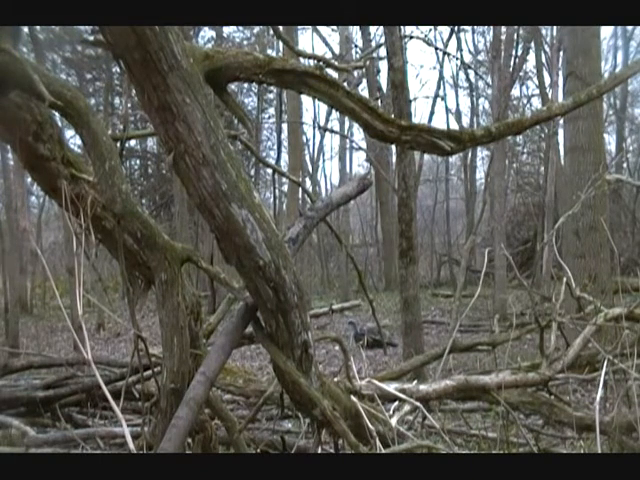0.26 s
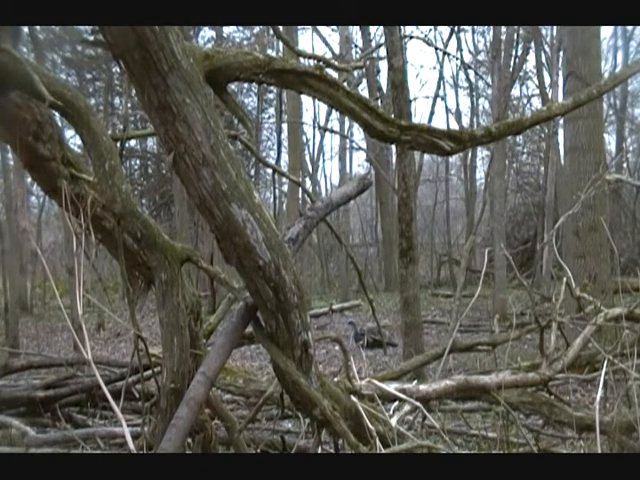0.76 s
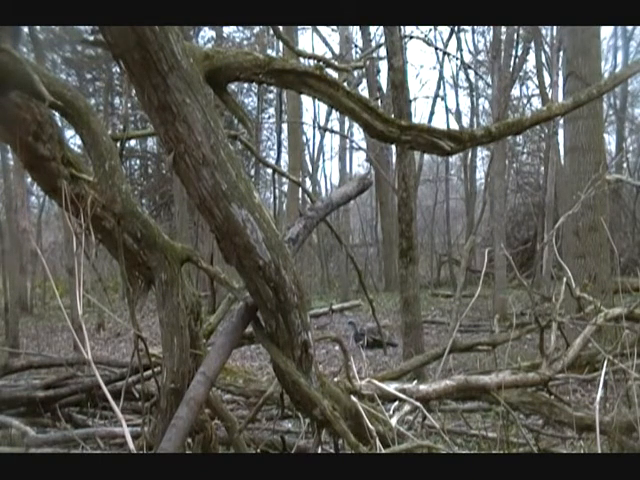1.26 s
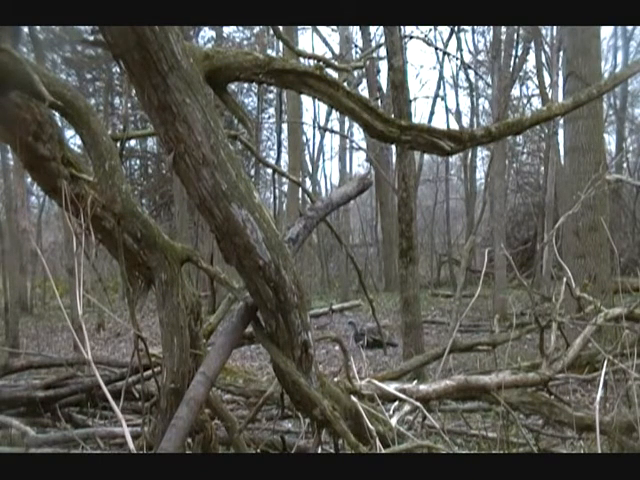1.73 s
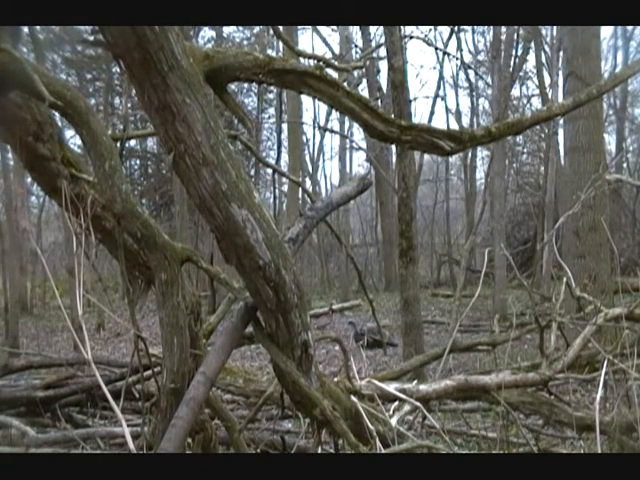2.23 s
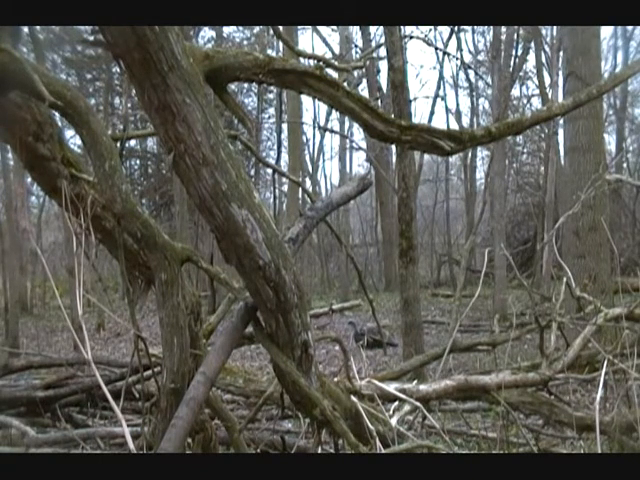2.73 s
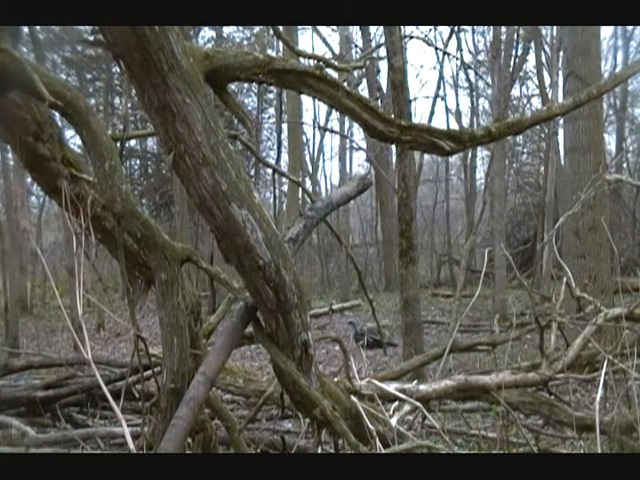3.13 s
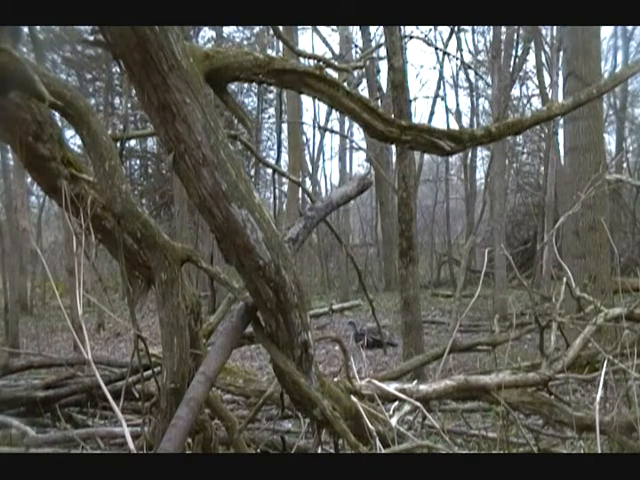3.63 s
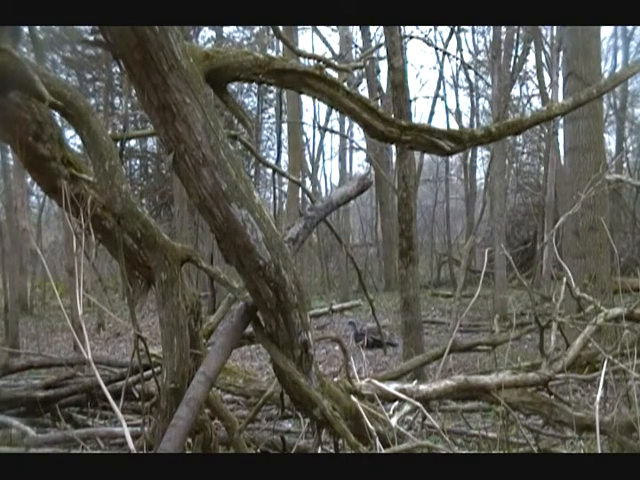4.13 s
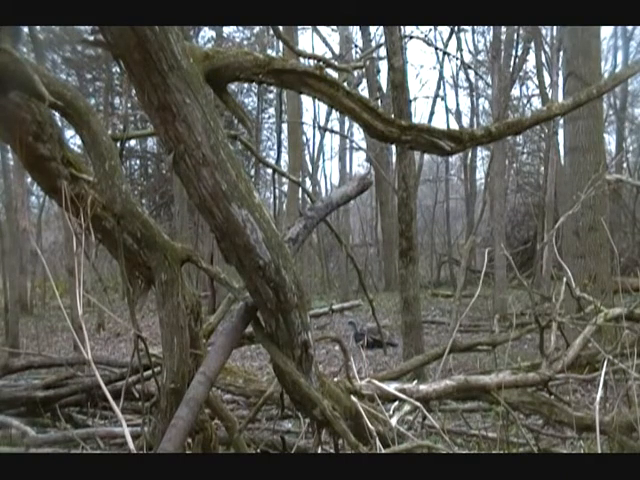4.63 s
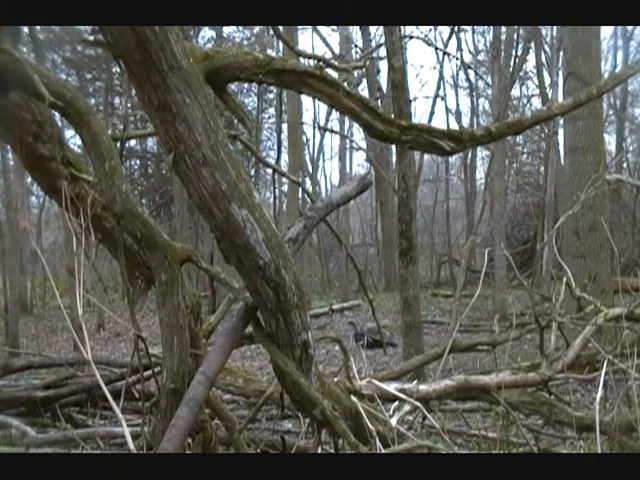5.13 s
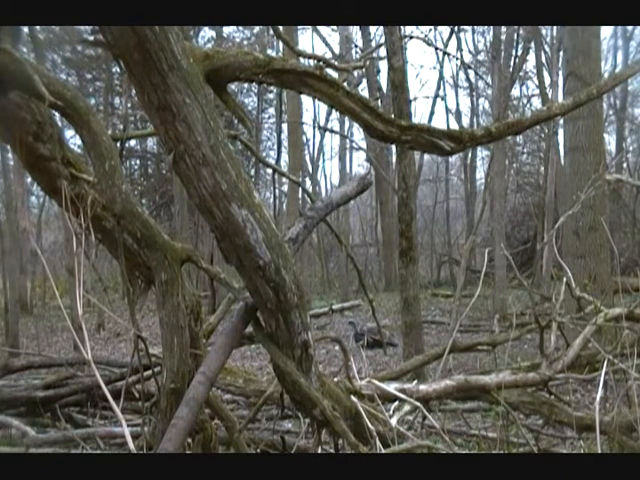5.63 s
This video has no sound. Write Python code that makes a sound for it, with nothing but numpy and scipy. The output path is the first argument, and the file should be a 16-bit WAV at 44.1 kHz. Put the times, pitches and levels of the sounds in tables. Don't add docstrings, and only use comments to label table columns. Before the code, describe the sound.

Dry, hollow hen clucks and yelps sound nearby in echoing woods, with falling bird whistles, chirps, hiss and a distant engine drone.

```python
import sys
import numpy as np
from scipy import signal
from scipy.fft import rfft, irfft
from scipy.io import wavfile
from scipy.ndimage import uniform_filter1d

SR = 44100
rng = np.random.default_rng(int(sys.argv[2]) if len(sys.argv) > 2 else 0)


def volts_from_db(level):
    exponent = np.asarray(level, float) / 20
    return 10 ** exponent


def output_pcm(signal):
    pcm = np.clip(np.atleast_2d(signal).T, -1, 1) * 32767
    wavfile.write(sys.argv[1], SR, np.round(pcm).astype(np.int16))


N = 258867


def level(x, db):
    return x * volts_from_db(db) / np.sqrt(np.mean(x ** 2))


def on_log(table, hz):
    f, v = np.transpose(table)
    return np.interp(np.log(np.maximum(hz, 1)), np.log(f), v)


def unroll(table):
    s, *columns = np.transpose(table)
    at = np.arange(int(s[0] * SR), min(int(s[-1] * SR), N))
    gate = np.minimum(1, np.minimum(at - at[0], at[-1] - at) / 88)
    return at, gate, [np.interp(at / SR, s, c) for c in columns]


def peaks(events, rise_db_per_s, fall_db_per_s):
    t = np.arange(N) / SR
    slopes = [db - np.maximum(rise_db_per_s * (s - t), fall_db_per_s * (t - s)) for s, db in events]
    return np.max(slopes, axis=0)


def resonance(x, hz, width_hz):
    return signal.lfilter(*signal.iirpeak(hz, hz / width_hz, SR), x)


def band(x, lo_hz, hi_hz):
    return signal.sosfiltfilt(signal.butter(4, (lo_hz, hi_hz), "band", fs=SR, output="sos"), x)


def walk(rate):
    k = int(SR / rate)
    steps = np.repeat(rng.standard_normal(N // k + 1), k)
    return uniform_filter1d(uniform_filter1d(steps, k), k)[:N] * 1.409


def ports(x, lag, left_db):
    turn = np.exp(-1j * np.pi * lag * np.arange(N // 2 + 1) / N)
    left = irfft(rfft(x) * turn, N) * volts_from_db(left_db / 2)
    right = irfft(rfft(x) / turn, N) * volts_from_db(-left_db / 2)
    return np.array([left, right])


def cluck_shape(start, length, pitch_hz, tone_db, over_db):
    t = np.linspace(0, length, 40)
    lift = 0.1 * np.exp((t - length) / 0.005)
    tense = 0.32 * (1202 - pitch_hz) * np.exp(-(t / 0.0051) ** 2)
    hz = pitch_hz * (1 + lift) + tense
    opening = 20 * np.maximum(1 - t / 0.0065, 0) ** 2
    closing = 32 * np.maximum(1 - (length - t) / 0.008, 0) ** 2
    sag = 80 * t
    peak = min(0.0098, length / 2)
    dull = np.maximum(17 * (1 - t / peak), 11 * (t - peak) / (length - peak))
    return np.transpose([start + t, hz, tone_db - (opening + closing) - sag, over_db - dull])


def membrane(shake, wheeze):
    # start t/s, length t/s, pitch f/Hz, fundamental level/dB, overtones level/dB
    clucks = [
        (.005, 0.019, 1028, -32.5, -44.5),
        (0.092, 0.016, 1010, -31, -43.5),
        (0.509, 0.023, 982, -26, -31.5),
        (0.666, 0.025, 1025, -25, -32.5),
        (1.086, 0.016, 1126, -28, -37.5),
        (1.115, 0.012, 1054, -33, -49),
        (1.77, 0.017, 1184, -39.5, -55),
        (1.792, 0.023, 1054, -25, -31.5),
        (2.36, 0.02, 1160, -43, -50),
    ]
    # t/s, pitch f/Hz, fundamental level/dB, overtones level/dB
    yelps = [
        [(2.378, 1233, -38, -50), (2.39, 1080, -38, -52), (2.395, 1038, -34, -38), (2.399, 1070, -22, -31.5),
         (2.404, 1080, -22.5, -28.5), (2.409, 1110, -36, -38), (2.413, 1250, -50, -48)],
        [(2.442, 1280, -55, -52), (2.446, 1134, -21, -39), (2.449, 1020, -23, -31), (2.452, 1012, -21, -26),
         (2.461, 1033, -24, -30), (2.467, 1210, -28, -43), (2.472, 1250, -59, -47)],
        [(1.201, 1125, -46, -60), (1.206, 1097, -40, -55), (1.21, 1044, -28, -39), (1.222, 942, -28.5, -39.5),
         (1.23, 979, -31.5, -38.5), (1.236, 900, -28.5, -42), (1.243, 1090, -28, -45), (1.248, 1060, -50, -41)],
        [(3.071, 1145, -44, -60), (3.075, 1170, -30, -52), (3.079, 1150, -26.5, -36), (3.084, 1034, -22.5, -32),
         (3.09, 1153, -28, -29), (3.096, 1160, -28, -33), (3.101, 1230, -24, -46), (3.107, 1260, -44, -58)],
        [(3.646, 1026, -50, -66), (3.649, 1008, -34, -52), (3.6505, 990, -26.5, -31), (3.652, 960, -24, -30),
         (3.655, 801, -25, -40), (3.665, 775, -28, -38.5), (3.678, 783, -29, -43.5), (3.683, 790, -32, -50),
         (3.692, 802, -32, -49), (3.699, 810, -58, -61)],
    ]
    # f/Hz, level/dB
    throat = [(1500, 4.5), (2100, 7.5), (3100, -1), (3500, -8.5), (3900, 1.5), (5000, -21), (6100, -20),
              (8000, -73), (10000, -55)]
    multiples = (0, 0, -2, 0, 0, 0, 0, 0)
    hoarse_db = 2.5
    out = np.zeros(N)
    flicker = np.roll(uniform_filter1d(shake, size=90), 7000) * 1.3
    for call in [cluck_shape(*c) for c in clucks] + yelps:
        at, gate, (hz, tone_db, over_db) = unroll(call)
        phase = 2 * np.pi * np.cumsum(hz * (1 + .016 * shake[at])) / SR
        over = volts_from_db(-8.5) * wheeze[at]
        for k, db in enumerate(multiples, start=2):
            over_level = on_log(throat, k * hz) + db + hoarse_db * flicker[at + 900 * k]
            over = over + volts_from_db(over_level) * np.cos(k * phase)
        out[at] += np.sqrt(2) * gate * (volts_from_db(tone_db) * np.cos(phase) + volts_from_db(over_db) * over)
    return out


def windpipe(shake):
    # loudest t/s, level/dB
    rings = [(.016, -45), (.101, -43.5), (0.52, -35), (.681, -29.5), (1.091, -41), (1.122, -40),
             (1.214, -31), (1.2245, -26), (1.236, -15), (1.241, -36), (1.773, -45), (1.807, -25.5),
             (2.41, -36), (2.454, -24), (2.467, -33), (3.083, -33.5), (3.095, -35), (3.655, -16.5),
             (3.661, -33), (3.667, -38), (3.671, -32), (3.677, -25.5), (3.688, -40), (3.694, -32),
             (3.7, -46)]
    # loudest t/s, level/dB
    high_rings = [
        (.519, -38),
        (1.224, -44),
        (1.232, -27.5),
        (1.24, -31),
        (1.248, -41),
        (1.254, -49),
        (2.453, -34),
        (2.462, -38),
        (3.652, -36),
        (3.66, -40),
    ]
    swell_s, fade_s, width_hz = 0.0031, 0.0033, 49.8
    out = np.zeros(N)
    for events, hz in ((rings, 1780), (high_rings, 2850)):
        swell = np.zeros(N)
        for s, db in events:
            late = np.arange(N) / SR - s
            swell += volts_from_db(db) * np.exp(-(late / np.where(late < 0, swell_s, fade_s)) ** 2 / 2)
        phase = 2 * np.pi * np.cumsum(hz + width_hz * np.roll(shake, -500)) / SR
        out += np.sqrt(2) * swell * np.sin(phase)
    return out


def purr(wheeze):
    # t/s, peak level/dB
    pulses = [(0.391, -43.5), (4.718, -48), (4.8326, -47.5), (4.901, -49), (4.9156, -47), (4.925, -42),
              (4.948, -53), (4.977, -53), (4.9928, -48), (5.0045, -41), (5.0147, -41), (5.0199, -41.5),
              (5.0304, -45), (5.048, -44), (5.0608, -40.5), (5.085, -46), (5.106, -42), (5.119, -53),
              (5.1656, -51), (5.186, -51), (4.884, -51), (5.442, -47), (5.4846, -53), (5.521, -50)]
    # loudest t/s, level/dB
    breath = [
        (4.74, -62),
        (4.92, -58),
        (5.03, -51),
        (5.09, -53),
        (5.17, -60),
        (5.47, -67),
    ]
    low_hz, high_hz = 1762, 2200
    haze = level(resonance(wheeze, low_hz, 160), 0) + level(resonance(wheeze, high_hz, 200), -9)
    out = haze * volts_from_db(peaks(breath, 150, 120))
    t = np.arange(1500) / SR
    swell = (t / 0.0029) * np.exp(1 - t / 0.0034)
    tone = np.sin(2 * np.pi * low_hz * t) + volts_from_db(-17) * np.sin(2 * np.pi * high_hz * t)
    for s, db in pulses:
        out[int(s * SR):][:1500] += volts_from_db(db + 2.5) * swell * tone
    return out


def hen():
    shake = walk(400)
    wheeze = level(resonance(rng.standard_normal(N), 1950, 560), 0)
    return membrane(shake, wheeze) + windpipe(shake) + purr(wheeze)


def beak_air(turkey):
    hiss = level(band(rng.standard_normal((2, N)), 4500, 10500), 0)
    return volts_from_db(-37.5) * uniform_filter1d(abs(turkey), size=220) * hiss


def whistle(notes, waver, flutter_db):
    out, shake, flutter = np.zeros(N), walk(120), walk(50)
    for note in notes:
        at, gate, (hz, db) = unroll(note)
        phase = 2 * np.pi * np.cumsum(hz * (1 + waver * shake[at])) / SR
        out[at] += np.sqrt(2) * gate * volts_from_db(db + flutter_db * flutter[at]) * np.sin(phase)
    return out


def falling_whistles():
    # t/s, f/Hz, level/dB
    glides = [
        [(0.03, 4300, -57), (.08, 4200, -58), (.13, 3940, -59), (.18, 3780, -60)],
        [(.245, 3460, -57), (.35, 3290, -59), (.43, 3130, -58), (.5, 3020, -58), (.6, 2750, -57),
         (.7, 2565, -60), (.79, 2450, -61)],
        [(2.33, 3980, -70), (2.38, 4200, -59), (2.42, 4370, -52), (2.48, 4500, -51), (2.54, 4650, -61),
         (2.6, 4390, -55), (2.67, 4090, -55), (2.74, 3930, -56.5), (2.8, 3860, -69)],
        [(2.81, 3490, -58), (2.84, 3400, -53.5), (2.92, 3305, -50), (3.0, 3274, -61.5), (3.1, 3060, -49.5),
         (3.25, 2850, -51), (3.45, 2550, -54.5), (3.66, 2290, -61)],
    ]
    return whistle(glides, .003, 1.5)


def note_shape(start, length, from_hz, to_hz, db):
    u = np.linspace(0, 1, 20)
    peak = min(0.018 / length, .6)
    bend = 1.5 + max(to_hz - from_hz, 0) / length / 5000
    soft = np.maximum(13 * (1 - u / peak), 8 * (u - peak) / (1 - peak))
    return np.transpose([start + length * u, to_hz + (from_hz - to_hz) * (1 - u) ** bend, db - soft])


def far_song():
    # start t/s, length t/s, first f/Hz, last f/Hz, level/dB
    far_notes = [(1.528, 0.091, 6340, 6500, -58), (1.62, .045, 6650, 7000, -57),
                 (3.2, 0.064, 5890, 6210, -45.5), (3.26, 0.081, 6200, 6530, -45),
                 (3.4, .04, 6480, 6490, -52), (3.5, .05, 8090, 8100, -54), (3.316, 0.041, 7360, 7770, -41),
                 (3.339, 0.046, 7850, 8130, -40.5), (3.38, 0.041, 8250, 8830, -42),
                 (1.864, 0.02, 3700, 4480, -47), (1.892, .016, 4480, 4490, -50),
                 (1.908, .016, 4520, 4520, -51), (1.99, .02, 4420, 4450, -58),
                 (4.097, 0.024, 3930, 4530, -42), (4.25, .02, 4560, 4480, -54),
                 (4.152, .022, 4480, 4480, -56), (4.22, .06, 4500, 4510, -60),
                 (4.453, .03, 4050, 4000, -49), (4.458, .025, 1530, 1480, -48),
                 (4.983, 0.022, 3280, 3380, -48), (4.886, 0.06, 4230, 4180, -60),
                 (5.542, .022, 2850, 2720, -54), (4.52, .11, 5160, 4920, -63),
                 (4.702, 0.03, 5850, 5700, -57), (4.728, .03, 5680, 5430, -51),
                 (4.762, 0.04, 5370, 5310, -44.5), (4.81, .1, 5300, 5290, -55),
                 (4.682, .07, 4420, 4340, -64), (4.745, 0.065, 4420, 4290, -53),
                 (4.838, 0.029, 4410, 4170, -39.5), (4.86, .018, 4150, 3800, -49),
                 (4.875, 0.022, 3720, 3430, -43), (4.898, 0.031, 3410, 3225, -45.5),
                 (4.93, .05, 3200, 3140, -49.5), (5.014, 0.084, 3220, 3240, -49.5),
                 (5.07, .16, 3240, 3240, -53.5), (5.28, 0.075, 5950, 5850, -53),
                 (.925, .05, 2750, 2710, -55), (.97, .045, 3030, 3000, -59),
                 (5.374, 0.038, 5400, 5200, -51), (5.2, .09, 3240, 3240, -58), (4.33, .09, 4500, 4480, -60),
                 (4.46, .018, 5550, 5650, -54), (4.123, .015, 4950, 5050, -56)]
    return whistle([note_shape(*w) for w in far_notes], .007, 2.5)


def thin_song():
    # t/s, f/Hz, level/dB
    thin_notes = [
        [(5.628, 7750, -56), (5.642, 8250, -50), (5.652, 8520, -43), (5.664, 8680, -42), (5.688, 8650, -42),
         (5.702, 8520, -47), (5.722, 8480, -50), (5.737, 8380, -51), (5.75, 8600, -54)],
        [(5.735, 8100, -61), (5.745, 7600, -59), (5.755, 6600, -62)],
        [(5.76, 6290, -58), (5.772, 6310, -48), (5.79, 6320, -47), (5.81, 6330, -51), (5.82, 6280, -49),
         (5.83, 6310, -56), (5.852, 6320, -53), (5.862, 6320, -57)],
        [(5.833, 7400, -57), (5.843, 7750, -53), (5.85, 8400, -45), (5.858, 8600, -41), (5.87, 8750, -41)],
    ]
    return whistle(thin_notes, .003, 2.5)


def syllable(out_len, from_hz, to_hz):
    u = np.linspace(0, 1, out_len)
    hz = to_hz + (from_hz - to_hz) * (1 - u) ** (1.2 + max(to_hz - from_hz, 0) / 900)
    return np.sin(np.pi * u ** 1.3) * np.sin(2 * np.pi * np.cumsum(hz) / SR)


def chirps():
    # t/s, peak level/dB, first f/Hz, last f/Hz
    syllables = [(.006, -42, 4370, 4950), (.168, -48, 4900, 4750), (.255, -50, 4800, 4850),
                 (.021, -45, 3180, 2600), (.043, -44, 2880, 3300), (.06, -44, 2900, 2200),
                 (.0, -43, 4250, 4540), (.163, -51, 2350, 2600), (.14, -42, 4400, 4900),
                 (.179, -45, 2920, 3400), (.19, -44, 2790, 2450), (.265, -44, 2300, 2150),
                 (.577, -40, 2720, 3000), (.933, -47, 1920, 2760), (1.478, -42, 2580, 2920),
                 (1.677, -46.5, 3020, 2260), (1.885, -39, 3330, 2860), (1.896, -40, 2900, 3370),
                 (1.913, -43, 2970, 2100), (2.021, -43, 2740, 3290), (2.038, -45, 2900, 2340),
                 (2.165, -48, 2520, 3280), (2.284, -46.5, 2470, 3200), (2.358, -43, 3000, 3250),
                 (3.23, -38.5, 2680, 3120), (3.996, -47, 2620, 3300), (4.002, -34.5, 1700, 3150),
                 (4.012, -46, 3300, 2900), (4.016, -51, 2920, 3070), (4.398, -49, 2300, 2900),
                 (4.428, -45, 2450, 2800), (4.447, -47, 2700, 2300), (4.1, -48, 2500, 2750),
                 (4.112, -50, 2600, 2400), (4.255, -52, 2900, 3150), (4.295, -49, 2500, 2350),
                 (4.118, -43, 2920, 3180), (4.129, -37, 2750, 3350), (4.146, -42, 3110, 2260),
                 (4.17, -45, 2650, 3200), (4.203, -37, 2100, 3050), (4.143, -48, 3400, 3800),
                 (4.476, -47, 3050, 2800), (.02, -48, 4950, 4500), (4.212, -49, 2870, 3030),
                 (4.221, -48, 2970, 3100), (4.627, -42, 2930, 3050), (5.176, -42.5, 2760, 3180)]
    ticks = [(3.299 + k * .068, -47.5, 4350, 5200) for k in range(3)]
    shortest_s, sweep_hz_per_s = 0.0101, 244000
    out = np.zeros(N)
    for s, db, from_hz, to_hz in syllables + ticks:
        size = int((shortest_s + abs(to_hz - from_hz) / sweep_hz_per_s) * SR)
        out[int(s * SR):][:size] += volts_from_db(db) * syllable(size, from_hz, to_hz)
    return out


def faint_babble():
    # loudest t/s, level/dB
    bouts = [
        (0, -50.5),
        (1.67, -54.5),
        (1.93, -49.5),
        (2.04, -51),
        (2.17, -55),
        (2.36, -55),
        (4.17, -50),
        (4.25, -52),
        (4.42, -55),
        (4.48, -53),
    ]
    out = np.zeros(N + SR)
    for k, (late, a, b, db) in enumerate(rng.random((N // 300, 4))):
        sweep = syllable(500, 2000 + 1700 * a, 2100 + 1600 * b)
        out[int((k + late) * 300):][:500] += volts_from_db(6 * db) * sweep
    return level(out[:N], 0) * volts_from_db(peaks(bouts, 141, 29))


def squawk():
    # t/s, f/Hz, level/dB, overtones level/dB
    calls = [
        [(5.578, 560, -50, -20), (5.597, 600, -46, -20), (5.608, 720, -50, -20)],
        [(5.59, 1103, -60, -20), (5.6, 1130, -47, -20), (5.609, 1149, -38, -20), (5.62, 1144, -40, -20),
         (5.626, 1310, -42.5, -20), (5.636, 1200, -46, -15), (5.65, 1290, -40, -13), (5.68, 1280, -45.5, -7),
         (5.71, 1270, -48, -9), (5.75, 1200, -50, -18), (5.81, 1150, -54, -18)],
        [(4.462, 1510, -54, -15), (4.472, 1475, -49, -15), (4.495, 1400, -53, -15)],
    ]
    out, shake, rattle = np.zeros(N), walk(250), walk(90)
    rasp = level(resonance(resonance(rng.standard_normal(N), 2150, 900), 2150, 800), -3.5)
    for call in calls:
        at, gate, (hz, db, over_db) = unroll(call)
        phase = 2 * np.pi * np.cumsum(hz * (1 + 0.022 * shake[at])) / SR
        others = volts_from_db(-7) * np.sin(phase) + volts_from_db(3.5) * np.sin(1.55 * phase)
        others += volts_from_db(-4) * np.sin(3 * phase) + volts_from_db(-14) * np.sin(4 * phase)
        voice = np.sin(2 * phase) + volts_from_db(over_db) * others + rasp[at]
        out[at] += gate * volts_from_db(db - 2.5 + 2.8 * rattle[at]) * voice
    return out


def trunks(x, t60, gap_s):
    t = np.arange(SR) / SR
    noise = rng.standard_normal((2, SR))
    dull = signal.sosfilt(signal.butter(4, 7000, fs=SR, output="sos"), noise)
    bright = volts_from_db(2.5) * (noise - dull)
    tail = dull * volts_from_db(-60 * t / t60) + bright * volts_from_db(-60 * t / t60 / .7)
    tail = tail * (1 - np.exp(-t / gap_s))
    tail = tail / np.sqrt(np.sum(tail ** 2, axis=1, keepdims=True))
    return signal.fftconvolve(x[None], tail)[:, :N]


def leaves(x, samples):
    t = np.arange(N)
    return np.array([np.interp(t + samples * walk(45), t, c) * volts_from_db(2.5 * walk(40)) for c in x])


def rustle():
    # loudest t/s, level/dB
    scuffs = [
        (1.48, -59),
        (1.66, -57),
        (4.003, -56),
        (4.465, -53),
        (4.49, -58),
    ]
    noise = resonance(rng.standard_normal((2, N)), 2600, 4000)
    return level(noise, 0) * volts_from_db(peaks(scuffs, 900, 250))


def drone():
    # start t/s, end t/s, first level/dB, last level/dB
    swells = [
        (0, 0.446, -44, -28.5),
        (.55, 1.1, -62, -61),
        (1.77, 2.222, -23, -24),
        (2.32, 2.694, -55, -26.5),
        (2.9, 3.06, -43, -53),
        (3.14, 3.56, -27, -36),
        (3.58, 3.77, -48, -27),
        (3.84, 4.81, -54, -26.5),
        (5, 5.87, -29.5, -42),
    ]
    t = np.arange(N) / SR
    slopes = []
    for a, b, first, last in swells:
        outside_s = np.maximum(np.maximum(a - t, t - b), 0)
        slopes.append(np.interp(t, (a, b), (first, last)) - 302 * outside_s)
    phase = 2 * np.pi * np.cumsum(76 + 4.48 * walk(8)) / SR
    note = np.sin(phase) * volts_from_db(1.4 * walk(12)) + volts_from_db(-15 + 2.1 * walk(20)) * np.sin(2 * phase)
    return ports(note * volts_from_db(np.max(slopes, axis=0) - 9.5), lag=2.7, left_db=2.5)


def passing():
    # nearest t/s, level/dB
    vehicles = [
        (0, -44),
        (.5, -46),
        (1.1, -47),
        (2.5, -45),
        (3.9, -48),
        (4.85, -47),
    ]
    hum = level(resonance(resonance(rng.standard_normal(N), 130, 70), 130, 70), 0)
    return ports(hum * volts_from_db(peaks(vehicles, 30, 18)), lag=3.5, left_db=2.2)


def woods():
    # f/Hz, level/dB per Hz
    spectrum = [(12, -54), (20, -20), (75, 1), (229, -17.5), (411, -23.5), (522, -22), (1010, -27),
                (1280, -28.5), (1770, -30), (3080, -34.5), (3340, -36), (3710, -35), (4020, -35.5),
                (4970, -36), (11300, -41.5), (14700, -87), (22000, -120)]
    # f/Hz, share/1
    shared = [(20, .9), (60, .995), (250, 0.86), (700, 0.78), (1500, 0.44), (3000, 0.74), (4500, 0.45),
              (6000, 0.031), (11000, 0.031)]
    # f/Hz, level/dB
    left_lead = [(25, 1.8), (60, 1), (1000, 1.5), (3600, 5), (11000, 5)]
    hz = np.arange(N // 2 + 1) * SR / N
    share = np.clip(on_log(shared, hz), 0, 1)
    both = ports(rng.standard_normal(N), lag=2.45, left_db=1.0)
    mix = np.sqrt(share) * rfft(both) + np.sqrt(1 - share) * rfft(rng.standard_normal((2, N)))
    mix = mix * volts_from_db(on_log(spectrum, hz) + np.array([[.5], [-.5]]) * on_log(left_lead, hz))
    octave = np.log2(np.clip(hz, 40, 40 * 2 ** 8) / 40)
    wash = np.zeros((2, N))
    for k in range(9):
        weight = np.clip(1 - abs(octave - k), 0, 1)
        wash += irfft(mix * weight, N) * volts_from_db(1.3 * walk(1.5) / (1 + .3 * k))
    return level(wash, -37.5)


def scene():
    turkey = hen()
    treble = band(turkey, 3500, 11000)
    direct = ports(turkey - treble, lag=4.5, left_db=3.0) + ports(treble, lag=5.7, left_db=-4.5)
    hen_tail = volts_from_db(-22) * trunks(resonance(turkey, 2100, 2500), 0.36, 0.0028)
    near_hen = direct + beak_air(turkey) + leaves(hen_tail, samples=14)

    glides, song, thin = falling_whistles(), far_song(), thin_song()
    high = signal.sosfiltfilt(signal.butter(10, 5900, "high", fs=SR, output="sos"), song)
    low = song - high
    warble, babble, caw = chirps(), faint_babble(), squawk()
    far = ports(glides + low, lag=2.6, left_db=1.5) + ports(warble + babble / 2, lag=3.0, left_db=1.2)
    far = far + ports(caw, lag=2.1, left_db=1.4) + ports(thin, lag=2.55, left_db=0)
    far = far + volts_from_db(-4) * ports(high, lag=1.1, left_db=3.0)

    echoed = volts_from_db(-7) * glides + volts_from_db(-5.5) * warble + babble + volts_from_db(-5) * (low + caw) + volts_from_db(-4) * high
    wet = trunks(echoed, 0.81, 0.0041) + volts_from_db(-11) * trunks(thin, .6, .004)
    return near_hen + far + leaves(wet, samples=4.5) + rustle() + drone() + passing() + woods()


def roll_off(x):
    return signal.sosfilt(signal.butter(12, 12220, fs=SR, output="sos"), x)


def record(dry):
    top_hz, spare_hz = 11290, 10250
    hz, spectrum = np.arange(N // 2 + 1) * SR / N, rfft(dry)
    spare = irfft(spectrum * (hz > spare_hz) * (hz < top_hz), N)
    busy = uniform_filter1d(resonance(dry[0], 1500, 1500) ** 2, 2048) > volts_from_db(-35) ** 2
    kept = irfft(spectrum * (hz <= spare_hz), N) + spare * (1 - uniform_filter1d(1. * busy, 400))
    return roll_off(kept)


dry = scene()
out = record(dry)
output_pcm(out)
```